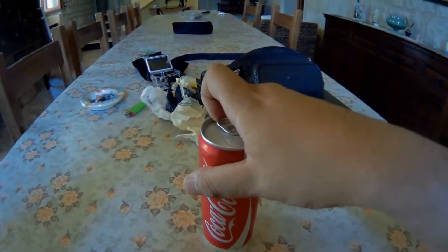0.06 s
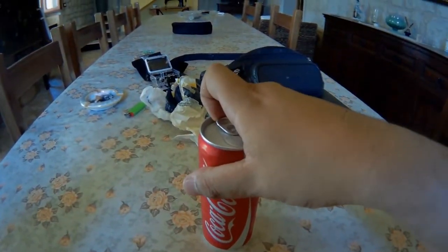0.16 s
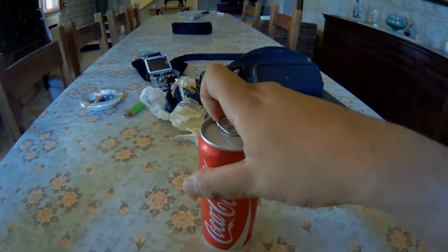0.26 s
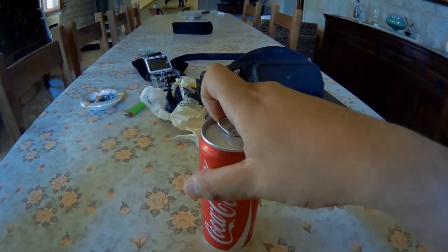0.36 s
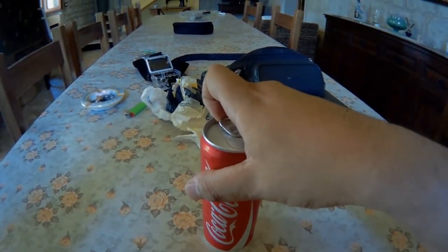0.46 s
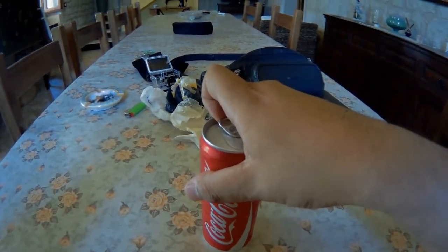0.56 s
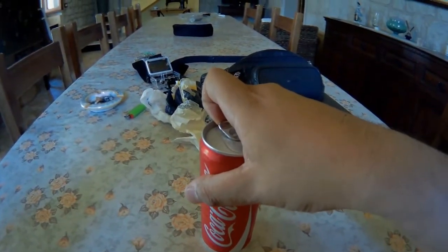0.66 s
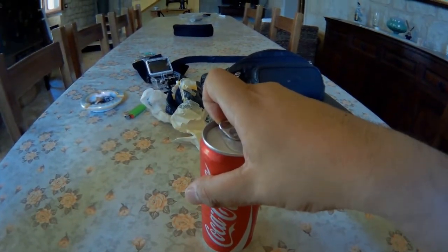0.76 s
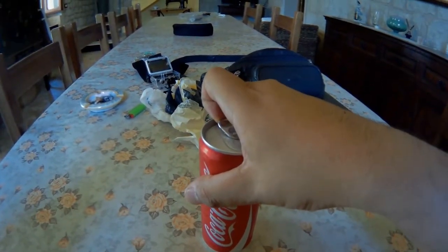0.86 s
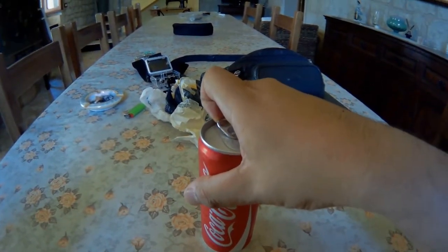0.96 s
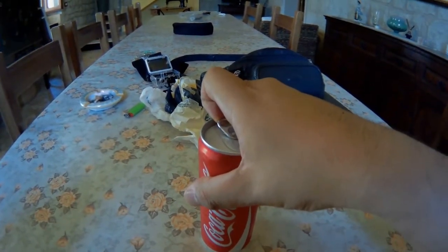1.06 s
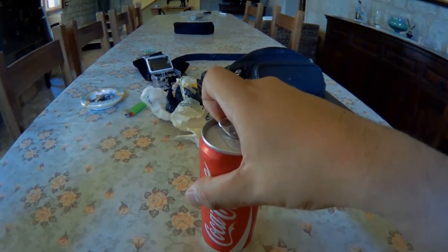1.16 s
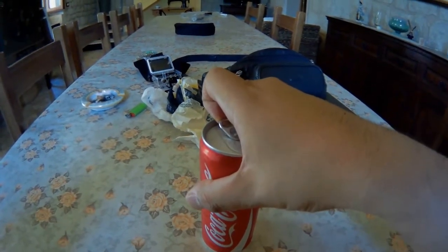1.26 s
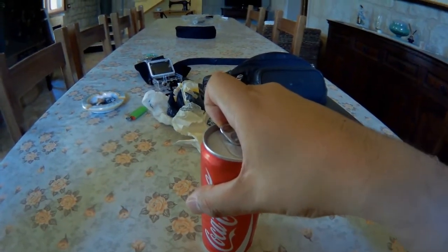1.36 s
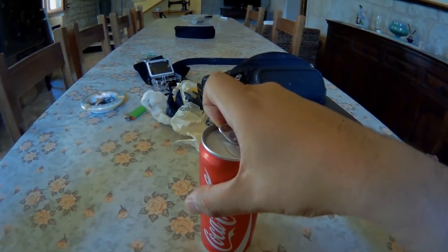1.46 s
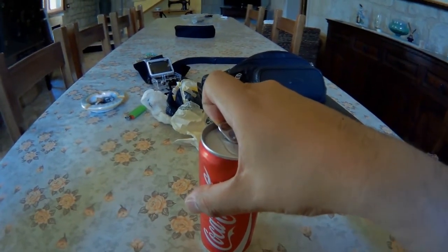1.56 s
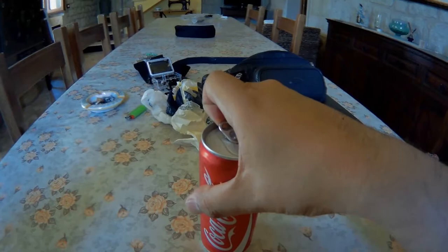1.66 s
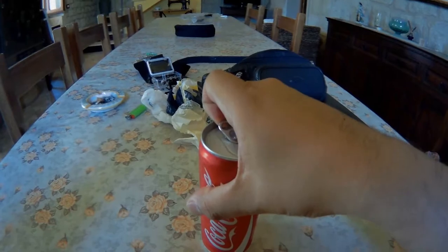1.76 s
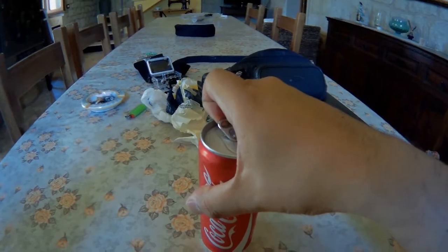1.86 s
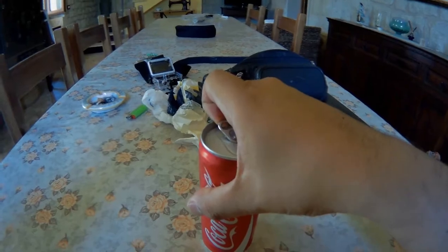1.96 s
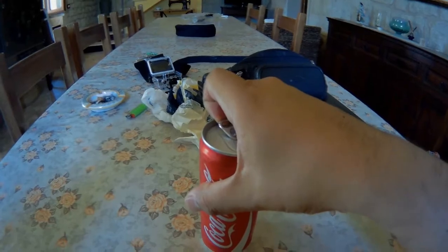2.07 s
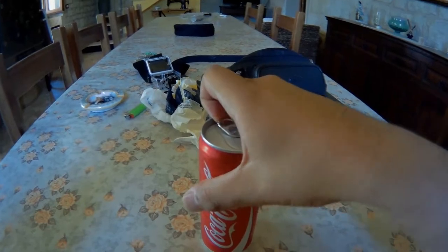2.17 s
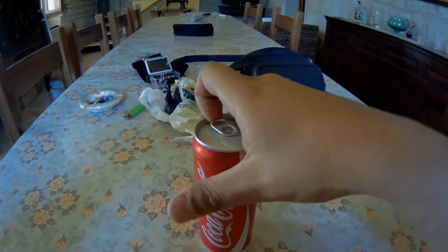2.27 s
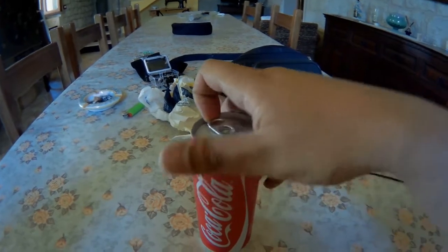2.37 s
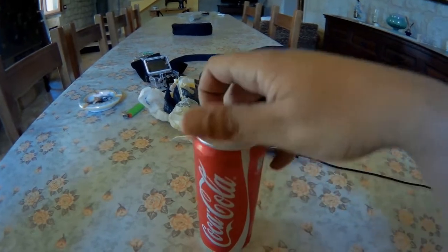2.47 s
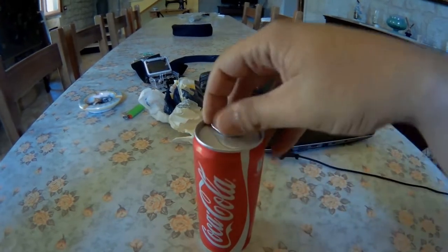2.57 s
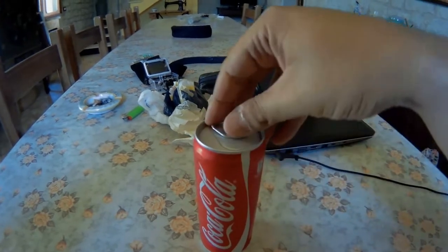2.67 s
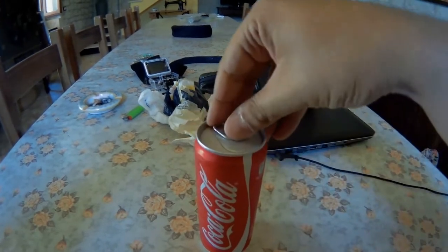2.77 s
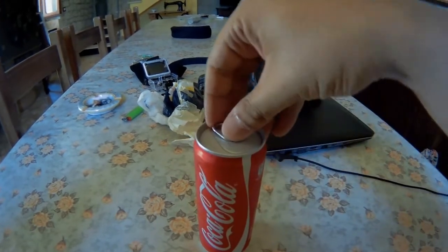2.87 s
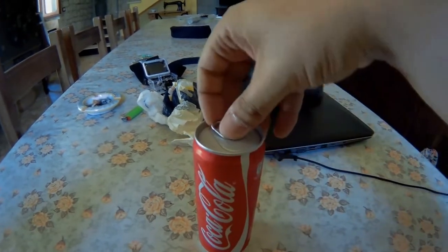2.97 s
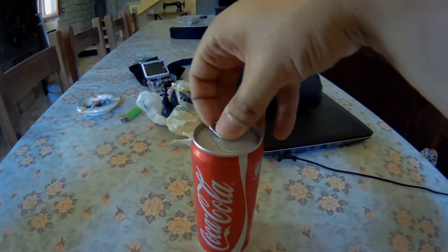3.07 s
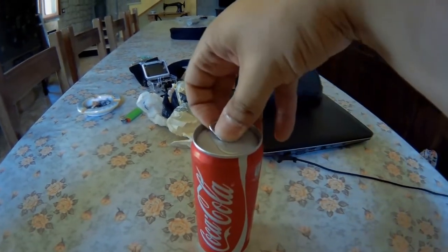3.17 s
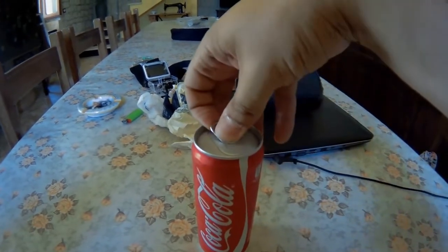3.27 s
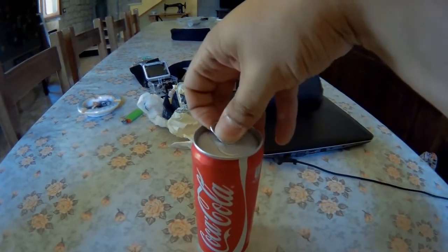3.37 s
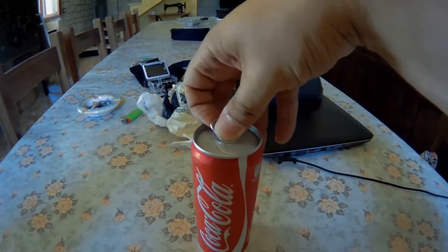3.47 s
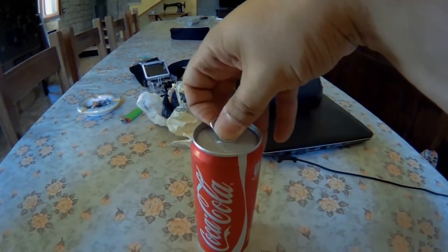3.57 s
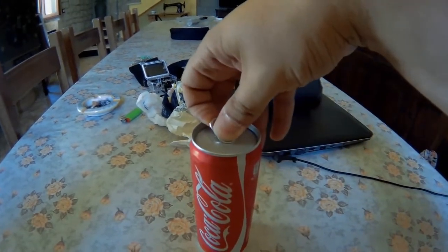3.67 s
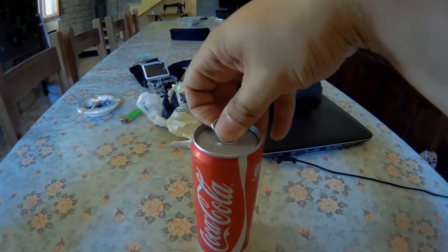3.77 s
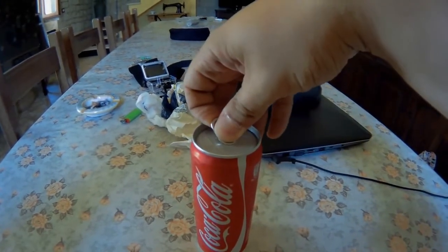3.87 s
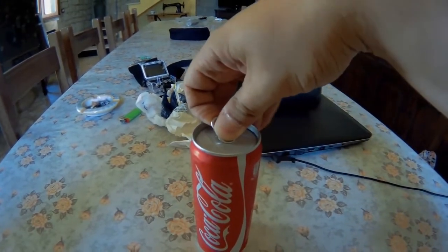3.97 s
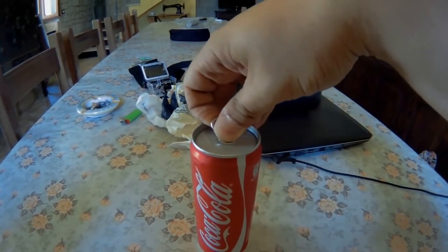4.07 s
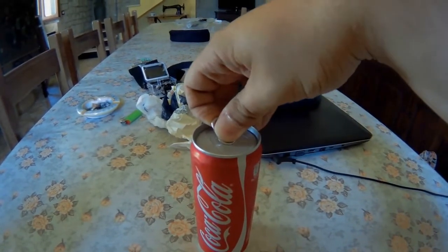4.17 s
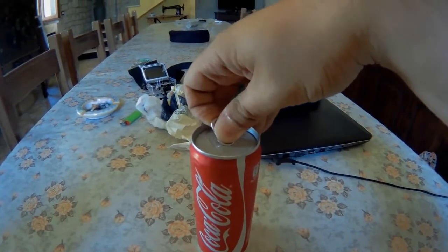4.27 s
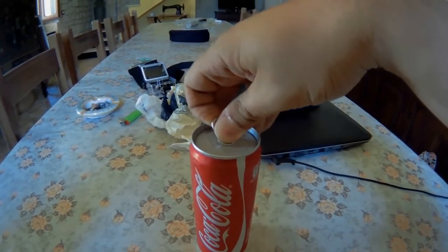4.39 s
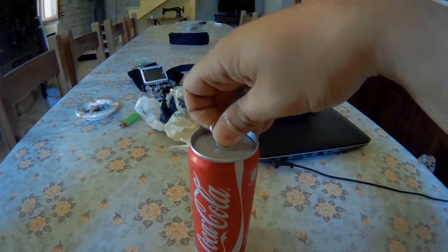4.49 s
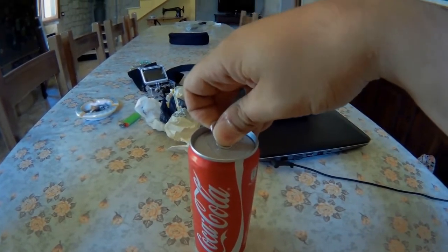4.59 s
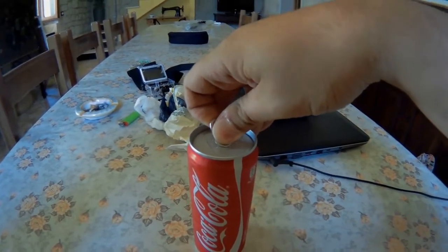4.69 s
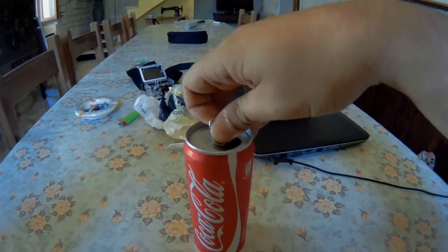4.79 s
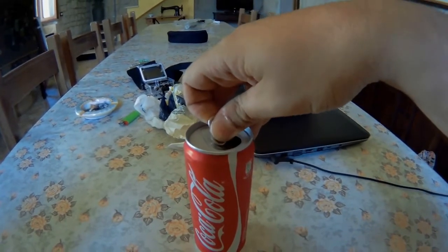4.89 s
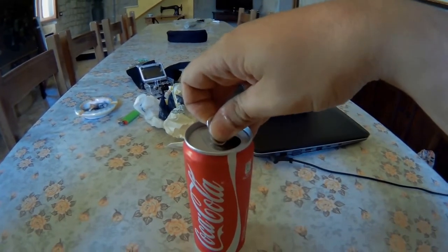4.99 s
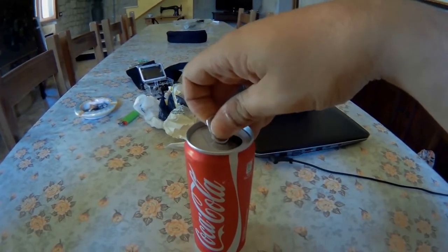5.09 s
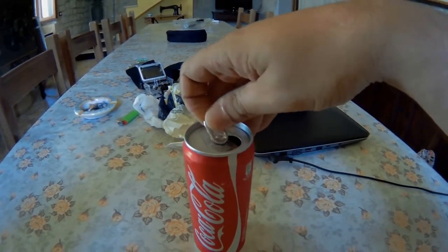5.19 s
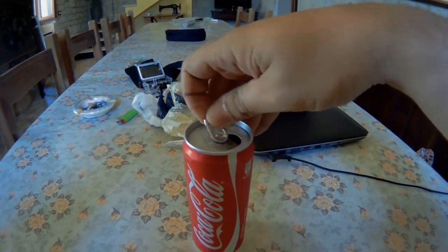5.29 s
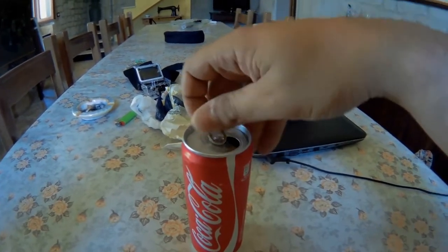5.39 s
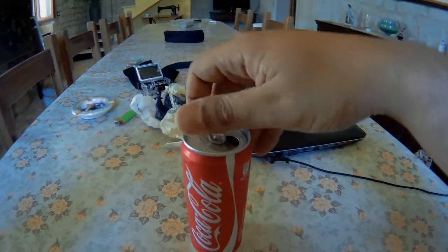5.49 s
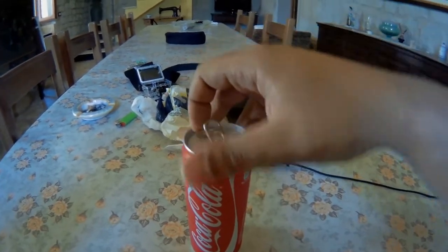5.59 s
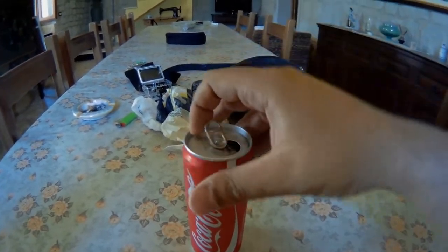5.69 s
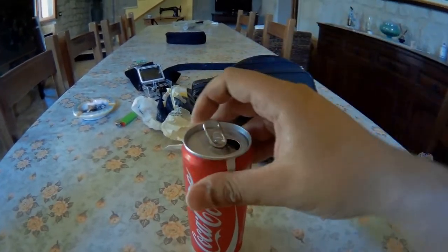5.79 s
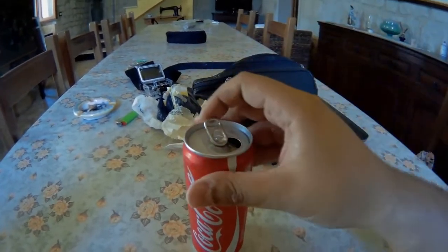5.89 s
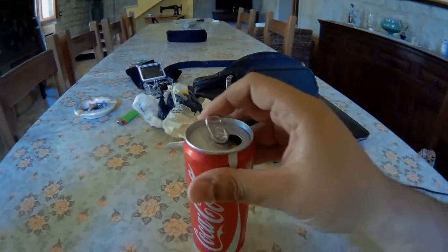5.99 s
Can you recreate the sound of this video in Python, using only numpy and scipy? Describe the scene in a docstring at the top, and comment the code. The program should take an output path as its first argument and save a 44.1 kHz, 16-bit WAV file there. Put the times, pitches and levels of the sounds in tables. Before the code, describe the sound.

A metal drink can is opened close up: short gas hiss, sharp ringing pop, then a very loud metallic crack, with faint sparrows outside.

```python
"""Sparrows chirp outside over quiet room tone: warbling whistles heard only through echoes, and coloured noise.
Then a hand works at a drink can in a hard-walled room; small contacts shake the lid's modes.
The seal cracks, gas hisses out as sputtering noise, and the rivet pops with a ring that sags in pitch.
The score line tears in ticks, the lid panel snaps in, loud enough to clip, and the opened can rings on."""
import sys
import numpy as np
from scipy import signal
from scipy.fft import rfft, irfft, next_fast_len
from scipy.io import wavfile
from scipy.ndimage import uniform_filter1d, map_coordinates

SR = 44100
rng = np.random.default_rng(int(sys.argv[2]) if len(sys.argv) > 2 else 0)


def voltage_ratio(decibels):
    """Convert decibels (scalar or array-like) to amplitude ratios, 20 dB per decade."""
    exponent = np.asarray(decibels, float) / 20
    return 10 ** exponent


def to_wav(s):
    """Save 16-bit WAV."""
    ch = np.atleast_2d(s).T  # columns
    pcm = np.round(np.clip(ch, -1, 1) * 32767)  # PCM
    wavfile.write(sys.argv[1], SR, pcm.astype(np.int16))


N = 266440  # length of the scene in samples

# room tone and microphone hiss, relative colour: pitch_hz, level_db (per Hz)
AIR_COLOUR = [(12, -29.5), (20, -3), (100, -2.5), (260, -4), (760, -11), (1600, -18.5), (3000, -25.5),
              (6000, -30), (13500, -30.5), (16000, -32.5)]
# far chatter of birds, relative colour: pitch_hz, level_db (per Hz)
FLOCK_COLOUR = [(3000, -27), (3500, -5), (3900, 2.5), (4600, -9), (5200, -7), (5700, -2), (6300, -31.5)]
# bird calls: start_s, level_db, pitch_factor, sweep_depth_factor
NEAR_CALLS = [(0.404, -63, 1.02, 1), (.815, -71, 0.94, 0.32), (0.937, -54, 0.94, 0.91),
              (1.846, -55.5, 0.98, 0.86), (3.274, -56, 0.97, 0.71), (4.25, -57, 0.92, .5),
              (5.47, -55.5, 0.94, 1)]
FAR_CALLS = [(0.12, -76, 0.97, 0.95), (2.436, -61, 1.0, 1.01), (5.865, -77, 1.22, 0.1)]
# chirp pitch before the call's factors: first_hz, top_hz, falls_towards_hz, top_at_s, fall_time_constant_s
FALL_PITCH = (4300, 5700, 2900, .016, .045)
HOLD_PITCH = (5750, 5800, 3500, .044, .014)
# chirp loudness: first_db, loudest_at_s, fade_db_per_s_squared, length_s
FALL_LEVEL = (-8, .048, 5500, .125)
HOLD_LEVEL = (-15, .062, 9000, .115)
# how long echoes last outside: pitch_hz, time_to_fall_60_db_s
YARD_DECAY = [(3000, 0.83), (6000, 0.57)]
# how long echoes last in the room: pitch_hz, time_to_fall_60_db_s
ROOM_DECAY = [(300, 1), (1200, 0.62), (4000, 0.53), (8000, 0.53), (14000, 0.29)]
# colour of the room's echoes: pitch_hz, level_db
ROOM_COLOUR = [(300, -6.5), (1200, -6.5), (4500, -7.5), (8000, -10), (14000, -13.5)]
# contacts and tears on the lid: start_s, peak_db, low_modes_boost_db, treble_modes_boost_db, tear_s
LID_SNAPS = [(0.9234, -39.5, -22, 16, 0.00076), (2.326, -54, -23, 6, 0.0009), (2.483, -52, -20, -1, 0.0012),
             (2.591, -45.5, 3, -10, 0.003), (3.4366, -35.5, -8.5, 0.5, 0.0023), (3.4695, -36, -8, -3, .002),
             (4.6135, -38, -9, 0, 0.001), (4.615, -27, -9.5, 1, 0.0027), (4.636, -17.5, -4, 1, 0.0027),
             (4.656, -33, -16.5, 0, 0.0018), (4.682, -24.5, -16.5, -3, .003), (4.7460, -13, -7, -4, 0.0007),
             (4.7473, -7, -12, -8.5, 0.0012), (4.761, -17.5, -12, -13, 0.00092),
             (4.7692, -2, -14.5, -12.5, 0.00091), (6.017, -49.5, 10, -10, .002)]
# modes of the lid and tab, relative: pitch_hz, width_hz, level_db
LID_MODES = [(1498, 600, 1), (2350, 450, -2), (3350, 650, -3), (4400, 300, 4.5), (4900, 350, 0.5),
             (5530, 500, -1), (7500, 230, -5.5)]
# what the lid's small snaps send out into the room: pitch_hz, level_db
SNAP_SPREAD = [(1800, -7), (3500, -2)]
# escaping gas, relative colour: pitch_hz, level_db (per Hz)
JET_COLOUR = [(200, -44.5), (500, -27), (900, -19.5), (1500, -12.5), (2800, -17), (3030, -36), (3250, -15),
              (4400, -1), (5600, -7.5), (6600, -11), (7600, -8.5), (9400, -9), (10400, -13), (11900, -4),
              (13500, -11), (16000, -17)]
# rings that sag: start_s, level_db, first_hz, last_hz, sag_time_constant_s, rise_s, hold_s, time_to_fall_60_db_s
POP_RING = (3.6354, 1, 5000, 4250, .0012, .0003, .0018, .016)
BUCKLE_RING = (4.7716, -1, 1550, 1300, 0.0044, 0.00033, .0018, .007)
# colour given to the pop's echoes, relative: pitch_hz, level_db (per Hz)
POP_ECHO_COLOUR = [(120, -56.5), (200, -24.5), (236, -22.5), (316, -22.5), (538, -23.5), (659, -24.5),
                   (1370, -15), (3070, -19.5), (4200, 0), (5420, -6), (6520, -20.5), (11700, -40),
                   (16000, -53)]
# colour given to the panel crack's echoes, relative: pitch_hz, level_db (per Hz)
PANEL_ECHO_COLOUR = [(120, -68), (200, -45), (401, -36), (680, -35), (899, -25), (1140, -4.5),
                     (1650, -12.5), (2560, -5.5), (3490, -7.5), (3830, -4.5), (4770, -18.5), (5420, -18),
                     (11900, -26), (16000, -47.5)]
# air and wall of the opened can, ringing freely: pitch_hz, level_db, time_to_fall_60_db_s
CAN_MODES = [(1172, -26, 0.36), (1152, -25, .25), (1254, -25, .2), (1300, -28, 0.21), (2580, -32, 0.27),
             (3470, -38, .2), (3830, -43, 0.56)]
# what sets the opened can ringing: start_s, level_db, rise_s, share of the free ring time left under the fingers
CAN_KNOCKS = [(4.773, 4, 0.0028, 1), (5.18, -17, 0.011, 0.2), (5.372, -30, .002, 0.08),
              (6.026, -25, 0.0016, 0.082)]


def unit(x):
    """Scales a sound to an average strength (rms) of 1."""
    return x / np.sqrt(np.mean(x ** 2) + 1e-20)


def along(points, hz):
    """Reads a curve of (Hz, value) points, joined on a log pitch axis."""
    f, v = np.transpose(points)
    return np.interp(np.log(hz + 1), np.log(f + 1), v)


def filtered(x, response):
    """Multiplies the spectrum of x by a response, given as a function of pitch in Hz."""
    m = next_fast_len(len(x) + 8192)
    spectrum = rfft(x, m) * response(np.fft.rfftfreq(m, 1 / SR))
    return irfft(spectrum, m)[:len(x)]


def coloured(x, colour):
    """Raises or lowers each pitch of x by a curve of (Hz, dB)."""
    return filtered(x, lambda hz: voltage_ratio(along(colour, hz)))


def noise(colour):
    """Steady noise of the given colour, rms 1."""
    return unit(coloured(rng.standard_normal(N), colour))


def wobble(rate):
    """A smooth random curve with this many knots a second."""
    knots = rng.standard_normal(int(N * rate / SR) + 4)
    return map_coordinates(knots, [np.arange(N) * rate / SR])


def add(track, sound, s):
    """Mixes a sound in from time s."""
    part = track[round(s * SR):][:len(sound)]
    part += sound[:len(part)]


def air():
    """Room tone and microphone hiss: coloured noise whose level drifts slowly."""
    return voltage_ratio(-62 + 0.49 * wobble(3.3)) * noise(AIR_COLOUR)


def tail(decay, gap_s):
    """A diffuse echo tail of energy 1; each pitch dies at its own speed."""
    hz, t, z = signal.stft(rng.standard_normal(SR), SR, nperseg=256)
    fade_db = -60 * t / along(decay, hz)[:, None]
    out = signal.istft(z * voltage_ratio(fade_db), SR, nperseg=256)[1]
    out = out * (1 - np.exp(-np.arange(len(out)) / SR / .003))  # echoes build up
    return np.pad(out / np.linalg.norm(out), (round(gap_s * SR), 0))


def chirps(pitch, level, calls, trill_hz, trill, rough_db):
    """A swept, husky whistle with a fast warble; only its echoes reach the room."""
    first_hz, top_hz, end_hz, top_s, fall_s = pitch
    first_db, loud_s, fade, length_s = level
    out, t = np.zeros(N), np.arange(round(length_s * SR)) / SR
    rise = first_hz + (top_hz - first_hz) * t / top_s
    fall = end_hz + (top_hz - end_hz) * np.exp((top_s - t) / fall_s)
    shape = np.where(t < top_s, rise, fall)
    swell_db = np.where(t < loud_s, first_db * (1 - t / loud_s), -fade * (t - loud_s) ** 2)
    for s, db, factor, depth in calls:
        sweep = shape.mean() + depth * (shape - shape.mean())
        warble = 1 + trill * np.sin(2 * np.pi * (trill_hz * t + rng.random()))
        hz = factor * sweep * warble
        husk = unit(uniform_filter1d(rng.standard_normal(N // 20), size=60)[:len(t)])
        call = voltage_ratio(db + swell_db + rough_db * husk) * np.sin(2 * np.pi * np.cumsum(hz) / SR)
        add(out, signal.fftconvolve(call, tail(YARD_DECAY, gap_s=0)), s)
    return out


def birds():
    """Two sparrows whistle over the chatter of a far flock, made of wavering noise."""
    near = chirps(FALL_PITCH, FALL_LEVEL, NEAR_CALLS, trill_hz=91.8, trill=0.02, rough_db=5)
    far = chirps(HOLD_PITCH, HOLD_LEVEL, FAR_CALLS, trill_hz=86.4, trill=0.014, rough_db=8.0)
    flock = voltage_ratio(-80.5 + 1.2 * wobble(4.1)) * noise(FLOCK_COLOUR)
    return near + far + flock


def echoes(x):
    """The room's answer to a close sound."""
    wet = signal.fftconvolve(x, tail(ROOM_DECAY, gap_s=.006))
    return coloured(wet, ROOM_COLOUR)


def lid(low_db, treble_db):
    """Response of the lid's modes; the boosts stand for where it is struck."""
    low_hz, treble_hz = 3000, 6500  # the broad panel rings below, the tab above

    def response(f):
        total = 0
        for k, (centre, width, db) in enumerate(LID_MODES):
            level_db = db + low_db * (centre < low_hz) + treble_db * (centre > treble_hz)
            mode = 1j * f * width / (centre * centre - f * f + 1j * f * width)
            total = total + (-1) ** k * voltage_ratio(level_db) * mode  # neighbours push opposite ways
        return total
    return response


def tear(db, low_db, treble_db, tear_s):
    """A push and a short tearing shake the lid, kept below 8.6 kHz."""
    t = np.arange(2048) / SR
    force = rng.standard_normal(len(t)) * np.exp(-t / tear_s)
    force[0] = 3.0  # the push
    force = signal.sosfilt(signal.butter(6, 8600, fs=SR, output="sos"), force)
    ring = filtered(force, lid(low_db, treble_db))
    return voltage_ratio(db) * ring / np.abs(ring).max()


def snaps():
    """Small contacts and tears shake the lid, each with the room's answer."""
    out = np.zeros(N)
    for s, *how in LID_SNAPS:
        ring = tear(*how)
        add(out, ring, s)
        add(out, coloured(echoes(ring), SNAP_SPREAD), s)
    return out


def gas():
    """A turbulent jet through the cracked seal, sputtering, until the rivet pops."""
    start_s, open_s, hold_s = 3.466, .012, .1
    level_db, first_db, sink_db_per_s = -25, -32, 169.5  # first_db is added to level_db at the start
    t = np.arange(N) / SR
    u = np.maximum(t - start_s, 0)
    opening_db = first_db * np.exp(-u / open_s)
    sinking_db = -sink_db_per_s * np.maximum(u - hold_s, 0)  # the pressure drops
    sputter_db = 2.1 * wobble(150)
    flowing = (u > 0) * (t < POP_RING[0])
    jet = flowing * voltage_ratio(level_db + opening_db + sinking_db + sputter_db) * noise(JET_COLOUR)
    return jet + voltage_ratio(-0.5) * echoes(jet)[:N]


def glide(ring, push_db, push_s):
    """A ring that rises, holds and dies while its pitch sags, over one low push of air."""
    _, db, first_hz, last_hz, sag_s, rise_s, hold_s, t60 = ring
    t = np.arange(2048) / SR
    u = t / push_s
    hz = last_hz + (first_hz - last_hz) * np.exp(-t / sag_s)
    size = voltage_ratio(db - 60 * np.maximum(t - hold_s, 0) / t60) * (1 - np.exp(-t / rise_s))
    push = voltage_ratio(push_db) * (1 - u) * np.exp(-u) * (1 - np.exp(-4 * u))
    return size * np.sin(2 * np.pi * np.cumsum(hz) / SR) + push


def click_echoes(colour):
    """The room's echoes of a single sharp click, given this smooth colour."""
    return coloured(echoes([1.]), colour)


def pop():
    """The vent gives way: a ring that sags in pitch over a jolt of the lid."""
    out, s = np.zeros(N), POP_RING[0]
    add(out, glide(POP_RING, push_db=-15.5, push_s=0.00052), s)
    add(out, tear(db=-5.0, low_db=-0.5, treble_db=4.0, tear_s=0.0024), s)
    add(out, voltage_ratio(24) * click_echoes(POP_ECHO_COLOUR), s)
    return out


def panel():
    """The last of the score line tears and the panel buckles in, with a sagging ring."""
    out, s = np.zeros(N), BUCKLE_RING[0]
    add(out, glide(BUCKLE_RING, push_db=-35, push_s=0.003), s)
    add(out, tear(db=4, low_db=3, treble_db=-7, tear_s=0.003), s)
    add(out, voltage_ratio(36) * click_echoes(PANEL_ECHO_COLOUR), s)
    return out


def hollow():
    """The opened can rings after the crack and at each later touch, which also taps the lid."""
    out, t = np.zeros(N), np.arange(SR // 2) / SR
    for s, level_db, rise_s, share in CAN_KNOCKS:
        ring = np.zeros(len(t))
        for hz, db, t60 in CAN_MODES:
            fade = voltage_ratio(db - 60 * t / (share * t60))
            ring += fade * np.sin(2 * np.pi * (hz * t + rng.random()))
        add(out, voltage_ratio(level_db) * ring * (1 - np.exp(-t / rise_s)), s)
        # the tap is 29 dB under the knock level; slow touches are duller
        tap = tear(level_db - 29, low_db=12 + 600 * rise_s, treble_db=-10, tear_s=rise_s)
        add(out, tap, s)
    return out


def scene():
    """The can close by in its room, with birds and the room tone, as one channel."""
    mix = air() + birds() + snaps() + gas() + pop() + panel() + hollow()
    return mix[None]


def low_pass(x):
    """Removes everything above the highest recorded frequency."""
    return signal.sosfilt(signal.butter(12, 16620, fs=SR, output="sos"), x)


def record(dry):
    """The input stage clips the loudest snaps with a rounded knee."""
    ceiling = .84
    clipped = dry / (1 + np.abs(dry / ceiling) ** 6) ** (1 / 6)
    return low_pass(clipped)


dry = scene()
out = record(dry)
to_wav(out)
```